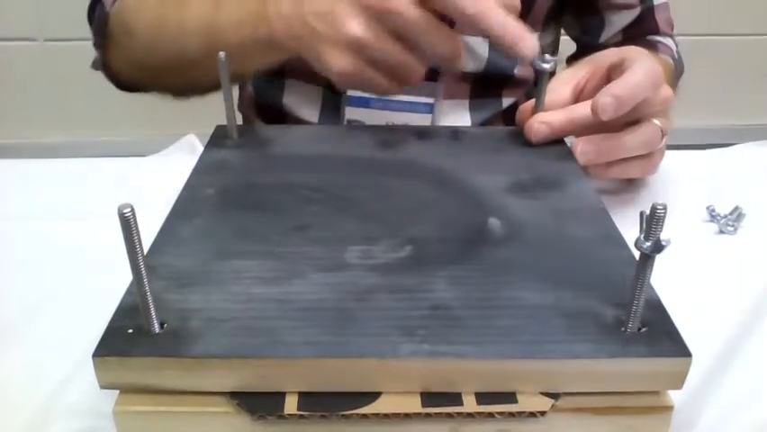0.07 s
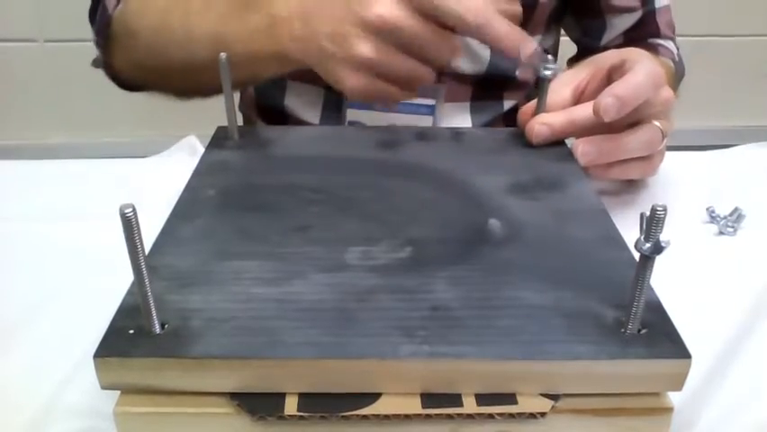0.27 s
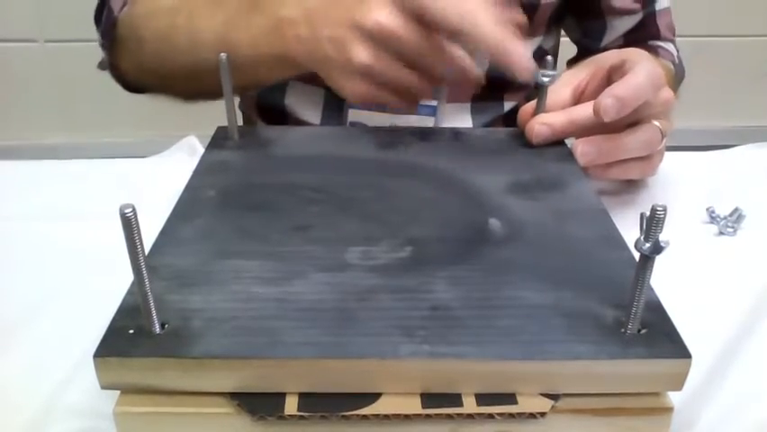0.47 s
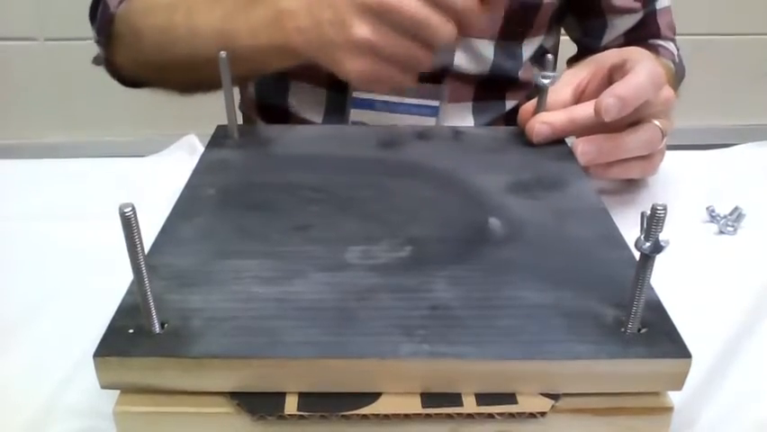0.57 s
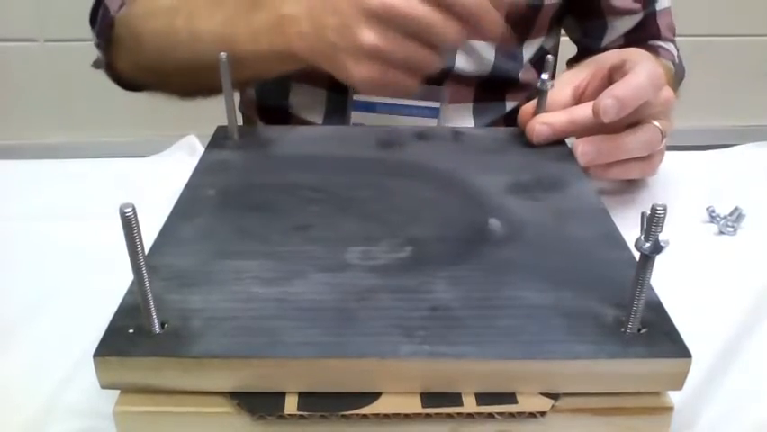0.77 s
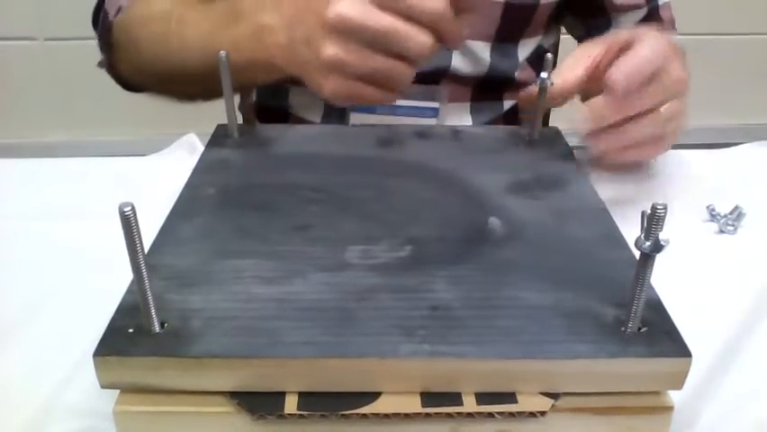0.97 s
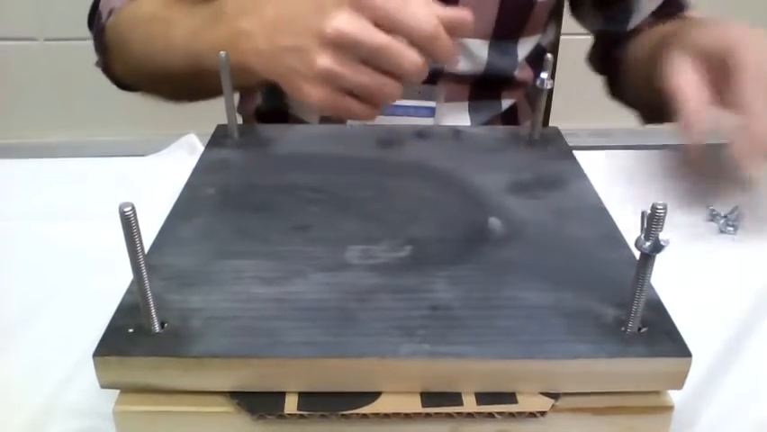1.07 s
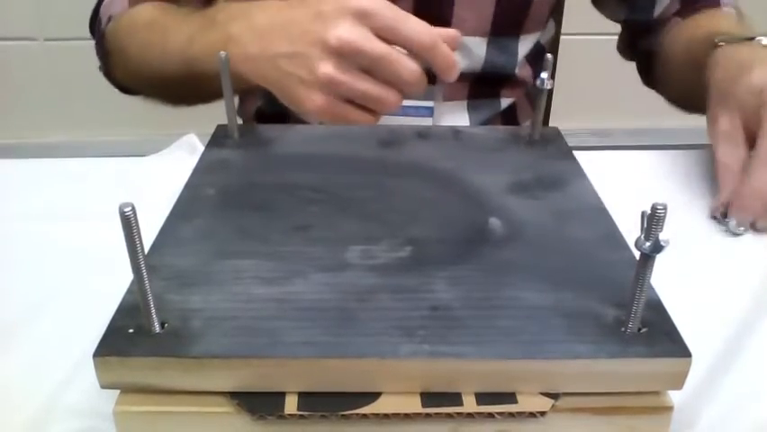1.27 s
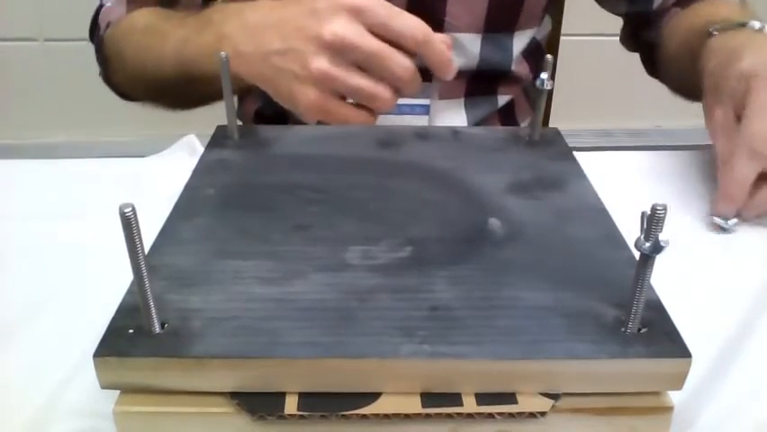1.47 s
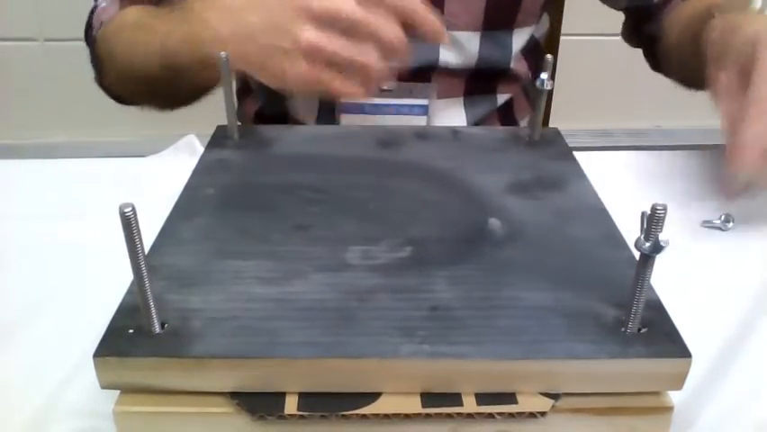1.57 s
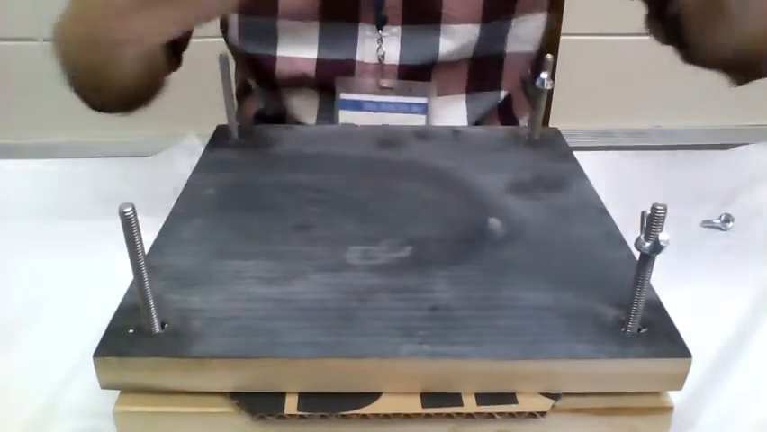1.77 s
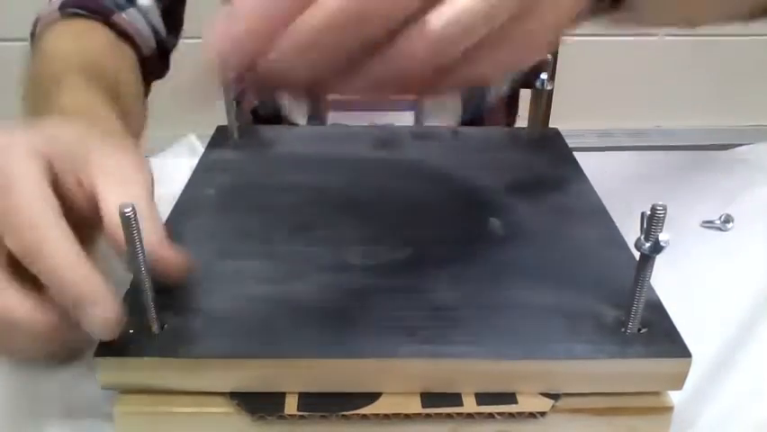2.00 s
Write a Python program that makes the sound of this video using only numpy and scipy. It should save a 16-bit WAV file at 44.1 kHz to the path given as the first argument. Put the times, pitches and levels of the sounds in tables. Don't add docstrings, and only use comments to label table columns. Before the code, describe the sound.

A metal wing nut rattles down a threaded bolt from the start, dense uneven clicks and harder knocks ringing bolt and board, stopping near 0.6 s. A dull soft bump follows at 0.7 s, then light hand taps and dry skin ticks around 1.0-1.1 s. A nut clinks from a pile at 1.4 s. Faint brushing precedes a nut landing and bouncing at 1.94-2.0 s. Small room, steady hiss, low rumble.

```python
import sys
import numpy as np
from scipy import signal
from scipy.fft import rfft, irfft
from scipy.io import wavfile
from scipy.ndimage import uniform_filter1d

SR = 44100
rng = np.random.default_rng(int(sys.argv[2]) if len(sys.argv) > 2 else 0)


def wav_out(sig):
    wavfile.write(sys.argv[1], SR, np.round(np.clip(np.atleast_2d(sig).T, -1, 1) * 32767).astype(np.int16))


def elevation(decibels):
    levels = np.asarray(decibels, float)
    return 10 ** (levels / 20)


N = 89875


def evened(x):
    return x / np.sqrt(np.mean(x ** 2) + 1e-20)


def read(points, hz):
    f, value = np.transpose(points)
    return np.interp(np.log(hz + 1), np.log(f + 1), value)


def band(x, hz, width_hz):
    turn = np.exp(2j * np.pi * hz * np.arange(len(x)) / SR)
    r = np.exp(-np.pi * width_hz / SR)
    return 2 * (turn * signal.lfilter([1 - r], [1, -r], x / turn)).real


def ring(modes, spread=0., count=1):
    t = np.arange(SR // 4) / SR
    hz, db, t60 = np.repeat(modes, count, axis=0).T[..., None]
    u = rng.uniform(-1.33, 1, (len(hz), 2, 1))
    decay = elevation(db + 2.5 * u[:, 1] - 60 * t / t60)
    tones = decay * np.sin(2 * np.pi * hz * (1 + spread * u[:, 0]) * t)
    soft_start = 1 - np.exp(-(t / 0.00035) ** 2)
    return tones.sum(0) / 2 / np.sqrt(count) * soft_start


def train(rows, scuff_s):
    out = np.zeros(N)
    for (s, db), u in zip(rows, rng.random((len(rows), 2, 5))):
        delays = np.append(0, u[0] * scuff_s * SR).astype(int)
        at = np.minimum(round(s * SR) + delays, N - 1)
        np.add.at(out, at, elevation(db) * np.append(1, 0.86 * (2 * u[1] - 1)))
    return out


def crack(rows, hz, width_hz, t60):
    out, t = np.zeros(N + SR), np.arange(4000) / SR
    for s, db in rows:
        noise = band(band(rng.standard_normal(len(t)), hz, width_hz), hz, width_hz)
        out[round(s * SR):][:len(t)] += elevation(db - 60 * t / t60) * evened(noise)
    return out[:N]


def struck(low, high, board, nut, spread, count=3):
    places = 4
    place = rng.integers(0, places, N // 128 + 1).repeat(128)[:N]
    out = np.zeros(N)
    for k in range(places):
        out += signal.oaconvolve(low * (place == k), ring(board, spread, count=count))[:N]
        out += signal.oaconvolve(high * (place == k), ring(nut, spread, count=count))[:N]
    return out


# (time [s], level [dB])
SPIN_LEVEL = [(0, -35.5), (0.027, -48.5), (0.058, -41), (.09, -94), (0.118, -65), (.165, -47), (.19, -51),
              (0.224, -37), (.3, -43.5), (.325, -39), (.335, -33.5), (0.361, -35.5), (.46, -40.5),
              (0.498, -53), (.53, -84), (.6, -109)]
# (time [s], strength [dB], brightness [dB])
THREAD_KNOCKS = [(.001, -27.5, -1.5), (.006, -27.5, -19), (.015, -25, -7), (.026, -33.5, -2),
                 (.037, -44, 4), (.048, -36.5, 1), (0.051, -48.5, -1.5), (0.0966, -25.5, 10.5),
                 (0.105, -34, -3), (0.1133, -31.5, 6), (.117, -39, 7), (0.1246, -23.5, -19),
                 (0.126, -25, -16), (.1305, -33, 4), (0.1343, -40, -20), (0.1441, -28.5, -20),
                 (.152, -35, -14), (0.172, -37, -10), (0.192, -42, 5), (.147, -31, -6), (.157, -27.5, -0.5),
                 (.167, -27, -11), (0.2112, -34, -2), (0.217, -35, -4), (0.2377, -40, -8), (0.293, -29, -7),
                 (.254, -28, -9), (.263, -21.5, -10), (0.277, -29, -6), (0.3, -26.5, -7), (0.3282, -21, 5),
                 (0.332, -39.5, 10), (.336, -26.5, 9), (0.342, -22.5, -7), (.352, -29.5, -19),
                 (.356, -38, -6), (0.371, -31.5, -29), (0.383, -26.5, -5), (.404, -25.5, -8),
                 (.421, -35.5, 3), (0.4308, -30, 0), (0.4548, -31, -15), (0.4766, -28, -7),
                 (0.484, -33.5, -15), (0.5056, -37.5, -4), (.513, -43, -16), (0.5317, -34, -1.5),
                 (0.5562, -23.5, -0.5), (.558, -29, -8), (0.5627, -35.5, -26), (.582, -55, -15)]
# (frequency [Hz], level [dB], t60 [s])
BOARD_MODES = [(269, -18.5, 0.061), (535, -18.5, 0.061), (817, -17.5, 0.066), (1082, -10.5, 0.014),
               (1320, -8, 0.051), (1465, -8.5, 0.064), (1596, -0.5, 0.049), (1760, -4, 0.037),
               (1856, -6, 0.046), (2020, -18.5, 0.03), (2550, -11, 0.052), (3400, -34, 0.019),
               (3987, -12.5, 0.022), (4260, -48, 0.017)]
# (frequency [Hz], level [dB], t60 [s])
NUT_MODES = [(3290, -6, 0.014), (4040, -11.5, 0.028), (4000, -45, 0.046), (5470, -13, 0.013),
             (6210, -19.5, 0.015), (6600, -18, 0.009), (9130, -18, 0.017), (9040, -28.5, 0.0065),
             (11100, -43, 0.0024), (14800, -22, 0.0093)]


def spin():
    clicks_per_s, click_spread_db, click_bright_db = 360, 3.3, -11
    t = np.arange(N) / SR
    u, e, g = rng.random(N), rng.exponential(1, N), rng.standard_normal((2, N))
    times, db = np.transpose(SPIN_LEVEL)
    level = elevation(np.interp(t, times, db)) * (t < times[-1])
    strength = np.sign(g[0]) * elevation(click_spread_db * (np.minimum(e, 3) - 2))
    clicks = 3 * level * (u < clicks_per_s / SR) * strength
    bright_knocks = [(s, db + bright) for s, db, bright in THREAD_KNOCKS]
    low = clicks + train([row[:2] for row in THREAD_KNOCKS], 0.002937)
    high = clicks * elevation(click_bright_db + g[1]) + train(bright_knocks, .003)
    rough = crack(np.add(bright_knocks, [0, -22]), 3800, 6500, 0.02)
    return struck(low, high, BOARD_MODES, NUT_MODES, 0.033) + rough


# (frequency [Hz], level per Hz [dB])
HISS_SPECTRUM = [(15, -13), (28, -7.5), (70, -19.5), (130, -20), (230, -25.5), (600, -32), (1500, -37),
                 (15500, -44.5)]


def floor():
    hz = np.fft.rfftfreq(N + 1, 1 / SR)
    hiss = irfft(rfft(rng.standard_normal(N + 1)) * elevation(read(HISS_SPECTRUM, hz)), N + 1)[:N]
    rumble_hz, rumble_width_hz = 53.6, 11
    rumble = band(rng.standard_normal(N), rumble_hz, rumble_width_hz)
    return elevation(-53) * evened(hiss) + elevation(-52) * evened(band(rumble, rumble_hz, 30))


# (frequency [Hz], t60 [s])
ROOM_DECAY = [(150, 0.59), (400, 0.5), (900, 0.63), (1700, 0.37), (2800, 0.23), (7000, 0.12)]


def room(x):
    delay_s, shift_hz = 0.0086, 9
    out, at = np.zeros(N), np.arange(0, SR - 20, 20)
    for k in range(3):
        taps = np.zeros(SR)
        taps[at + rng.integers(0, 20, len(at))] = rng.choice([-1., 1.], len(at))
        hz, t, z = signal.stft(taps * (np.arange(SR) > delay_s * SR), SR, nperseg=256)
        tail = signal.istft(z * elevation(-60 * t / read(ROOM_DECAY, hz)[:, None]), SR, nperseg=256)[1]
        share = np.sqrt(2 / 3) * np.cos(2 * np.pi * (shift_hz * np.arange(N) / SR + k / 3))
        out += signal.fftconvolve(x * share, tail / np.linalg.norm(tail))[:N]
    return elevation(-10.5) * out


# (time [s], strength [dB], frequency [Hz], t60 [s])
WOOD_NOTES = [(.0985, -36.5, 634, 0.037), (.102, -24, 610, 0.028), (.1, -31.5, 1210, 0.017),
              (1.9365, -21, 693, 0.028), (1.937, -36, 400, 0.052), (1.942, -25, 1126, 0.063),
              (1.9525, -30.5, 1056, 0.032), (1.956, -31, 938, 0.08), (1.978, -28, 273, 0.039),
              (1.987, -43, 1170, .04), (2.0, -33.5, 290, 0.029), (.5495, -28, 92, 0.07),
              (1.939, -23.5, 2050, 0.023), (1.98, -32, 2000, 0.018)]


def thuds():
    out, t = np.zeros(N + SR), np.arange(SR // 8) / SR
    soft_start = 1 - np.exp(-t / 0.00041)
    for s, db, hz, t60 in WOOD_NOTES:
        note = elevation(db - 60 * t / t60) * np.sin(2 * np.pi * hz * t)
        out[round(s * SR):][:len(t)] += note * soft_start
    return out[:N]


# (time [s], strength [dB], upper-mode level [dB], contact time [s])
TABLE_BUMPS = [
    (0.099, -36.5, 9, 0.0014),
    (0.341, -35.5, 1.5, 0.0018),
    (0.5398, -28.5, -3, 0.0028),
    (0.71, -27, -6, 0.0097),
    (1.0163, -38, 8, 0.0004),
    (1.046, -63, -1, 0.0014),
    (1.082, -45, 7.5, 0.0015),
    (1.386, -53.5, 16.5, 0.00043),
    (1.936, -39, 1.5, 0.00065),
    (1.974, -48, 11.5, 0.00066),
]
# (frequency [Hz], level [dB], t60 [s])
THUMP_MODES = [(84, -19, 0.077), (105, 2, 0.072)]
# (frequency [Hz], level [dB], t60 [s])
TABLE_MODES = [(172.4, -3, 0.13), (275, -7, 0.056), (377, -10, 0.089), (433, -3.5, 0.045),
               (561, -9.5, 0.09), (790, -19, 0.061), (1080, -15, 0.073), (1700, -7.5, 0.02)]


def bumps():
    out, thump = np.zeros(N + SR), ring(THUMP_MODES)
    for s, db, upper_db, contact_s in TABLE_BUMPS:
        push = np.hanning(max(round(contact_s * SR), 3) + 2)
        response = thump + elevation(upper_db) * ring(TABLE_MODES, 0.017)
        sound = elevation(db) * signal.fftconvolve(response, 2 * push / push.sum())
        out[round(s * SR):][:len(sound)] += sound
    return out[:N]


# (time [s], strength [dB], centre [Hz])
SKIN_TICKS = [(1.0478, -36.5, 10600), (1.0746, -43, 13500), (1.076, -45, 7400), (1.081, -44, 12000),
              (1.0812, -48, 6440), (1.085, -52, 7500), (1.088, -48, 8950), (1.0905, -48, 10000),
              (1.093, -50, 15100), (1.095, -47, 7500), (1.017, -40, 4500)]
BRUSH_STARTS = [.7, 1.04, 1.885, 1.8, 1.82, 1.07, 1.07]
# (length [s], level [dB], centre [Hz], width [Hz])
SKIN_BRUSHES = [
    (0.056, -57, 7000, 10000),
    (0.16, -63.5, 9800, 8300),
    (0.038, -60, 1950, 40),
    (0.19, -59.5, 370, 2200),
    (0.025, -61, 6800, 2600),
    (.035, -59, 6700, 12000),
    (.04, -57, 15300, 900),
]


def skin():
    out, t = np.zeros(N + SR), np.arange(300) / SR
    for s, db, hz in SKIN_TICKS:
        tick = band(band(rng.standard_normal(len(t)), hz, .4 * hz), hz, .4 * hz)
        out[round(s * SR):][:len(t)] += elevation(db - 60 * t / .006) * evened(tick)
    for s, (length_s, db, hz, width_hz) in zip(BRUSH_STARTS, SKIN_BRUSHES):
        grit = rng.standard_normal((SR // 4, 2))[:round(length_s * SR)]
        grains = grit[:, 0] * elevation(3.7 * evened(uniform_filter1d(grit[:, 1], 60)))
        swell = np.sin(np.pi * np.linspace(0, 1, len(grit)) ** 0.81)
        sound = evened(band(band(grains, hz, width_hz), hz, width_hz)) * swell
        out[round(s * SR):][:len(sound)] += elevation(db) * sound
    return out[:N]


# (time [s], strength [dB])
PICK_CLINKS = [
    (1.3847, -19),
    (1.3868, -36),
    (1.397, -43),
    (1.405, -43),
    (1.417, -34),
]
# (frequency [Hz], level [dB], t60 [s])
PILE_MODES = [(530, -15.5, 0.036), (910, -33, 0.014), (1374, 2.5, 0.011), (2730, 6.5, 0.0067),
              (2830, -1.5, 0.021), (3510, -2.5, 0.011), (3780, 9.5, 0.011), (4100, 0, 0.0084),
              (4840, -15, 0.0066), (4960, 3, .005)]


def pick():
    clink = train(np.subtract(PICK_CLINKS, [0, 3]), 0)
    rough = crack(np.add(PICK_CLINKS, [0, -18]), 2600, 3200, 0.0091)
    rustle = crack([(1.39, -43)], 1530, 3300, 0.18)
    upper_modes = [(5850, -1, 0.0056), (6660, -33, .005)]  # Hz, dB, t60 s
    return struck(clink, clink, PILE_MODES, upper_modes, 0.015, count=1) + rough + rustle


# (time [s], strength [dB], brightness [dB])
DROP_BLOWS = [(1.937, -30, 13), (1.939, -36, 4.5), (1.9405, -27.5, 4), (1.945, -24, -6), (1.952, -36, -8),
              (1.973, -35, 0), (1.9755, -30.5, 10.5), (1.978, -24, 3.5), (1.981, -27.5, -4),
              (1.982, -46, 10), (1.984, -30, -11), (1.989, -44, -12), (2.002, -50, -15), (2.013, -53, -15),
              (2.022, -50, -16)]
# (frequency [Hz], level [dB], t60 [s])
NEXT_BOARD_MODES = [(281, -16.5, 0.071), (560, -14.5, 0.022), (767, -5.5, 0.019), (929, -4, 0.045),
                    (1110, -6.5, .03), (1320, -4, 0.034), (1523, -4, .025), (1690, 0, 0.017),
                    (2000, -7, 0.021), (2420, -4, .02)]
# (frequency [Hz], level [dB], t60 [s])
NEXT_NUT_MODES = [(2060, -11.5, 0.017), (2630, -4, 0.016), (3270, -11, 0.011), (3730, -14, 0.021),
                  (4470, -10.5, .012), (4630, -12, 0.0083), (4950, -9, 0.012), (6800, -19, 0.011)]
# (time [s], strength [dB])
BOLT_TIP_BLOWS = [
    (1.937, -20),
    (1.9385, -40),
    (1.977, -49),
    (1.981, -36),
]
# (frequency [Hz], level [dB], t60 [s])
BOLT_TIP_MODES = [(8900, 1.5, 0.0079), (10500, -13, .005), (12300, -11, 0.0044), (14300, -4, .005)]


def drop():
    bright_blows = [(s, db + bright) for s, db, bright in DROP_BLOWS]
    rough = crack(np.add(bright_blows, [0, -13]), 3200, 3800, 0.013)
    tip = signal.oaconvolve(train(BOLT_TIP_BLOWS, 0.0011), ring(BOLT_TIP_MODES, .02, count=2))[:N]
    low = train([row[:2] for row in DROP_BLOWS], 0.0021)
    high = train(bright_blows, .002)
    return struck(low, high, NEXT_BOARD_MODES, NEXT_NUT_MODES, 0.029, count=2) + rough + tip


def scene():
    near = spin() + thuds() + bumps() + skin() + pick() + drop()
    return (near + room(near) + floor())[None]


def band_limit(x):
    return signal.sosfilt(signal.butter(12, 16480, fs=SR, output="sos"), x)


def record(dry):
    low_pass = signal.firwin(301, 15600, window=("kaiser", 2), fs=SR)
    mix = signal.oaconvolve(dry, low_pass[None], "same")
    return band_limit(mix)


dry = scene()
out = record(dry)
wav_out(out)
```